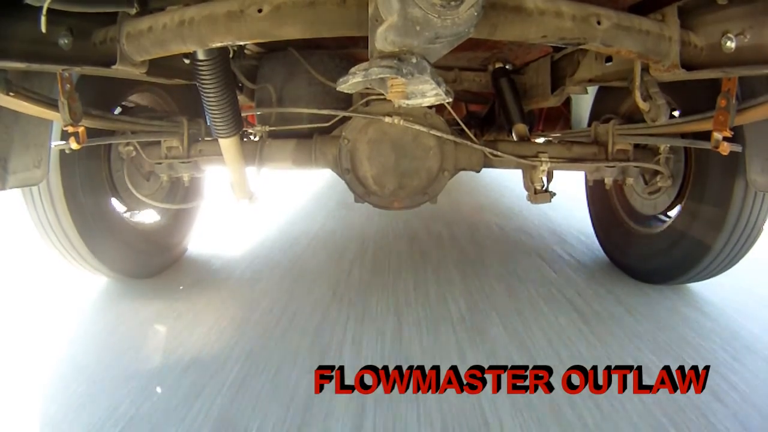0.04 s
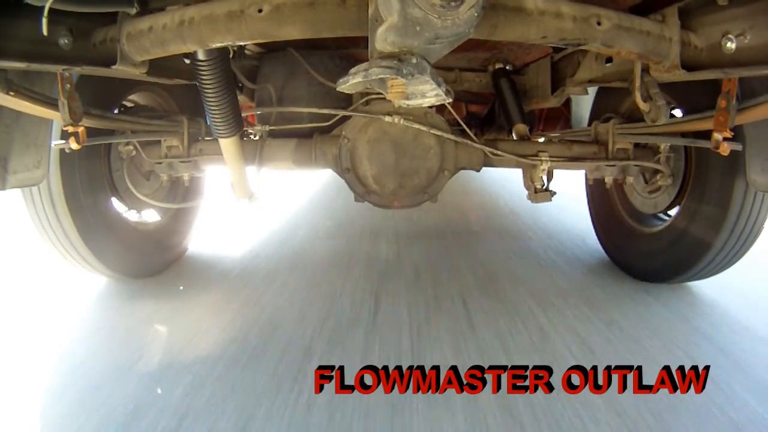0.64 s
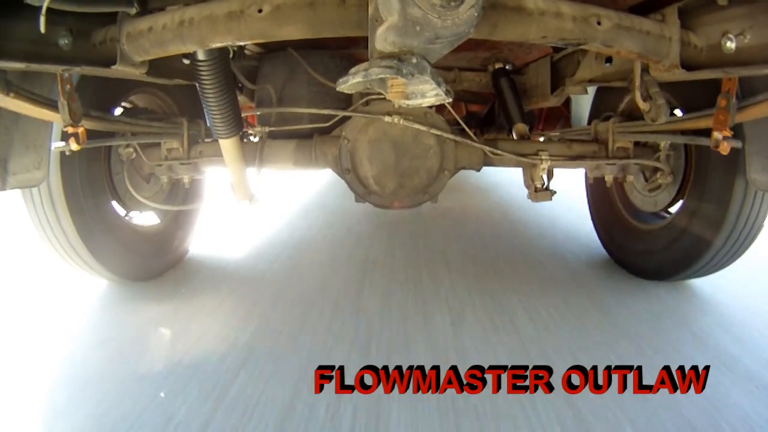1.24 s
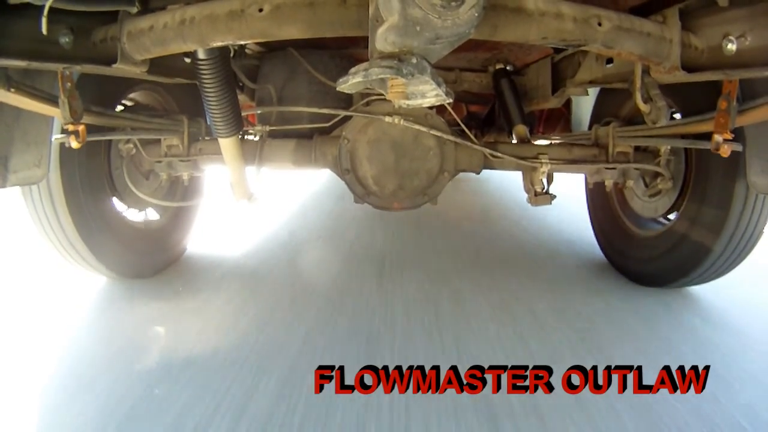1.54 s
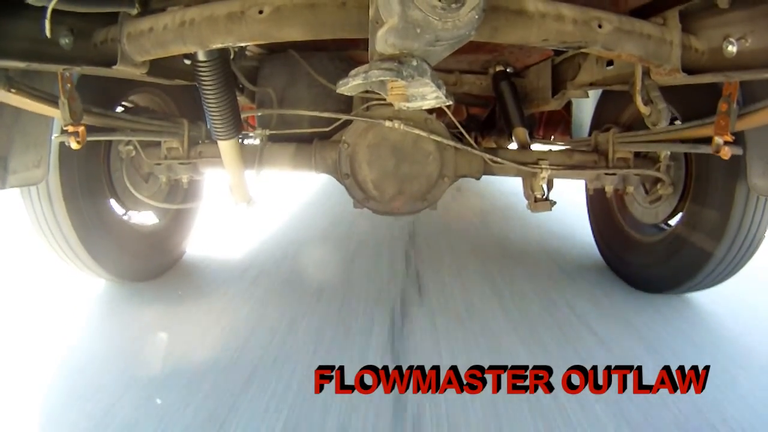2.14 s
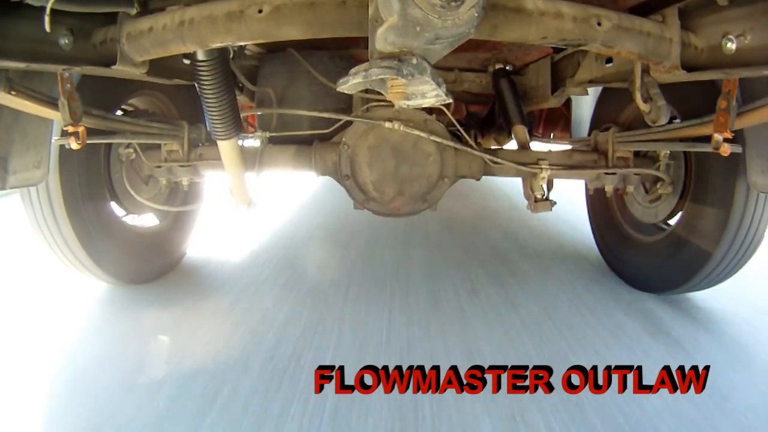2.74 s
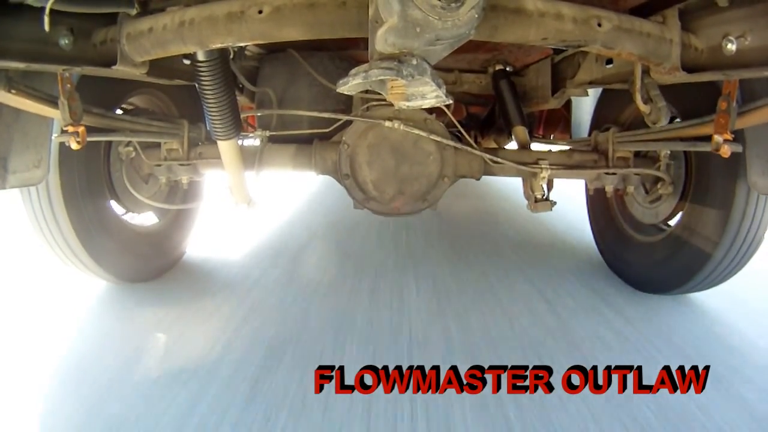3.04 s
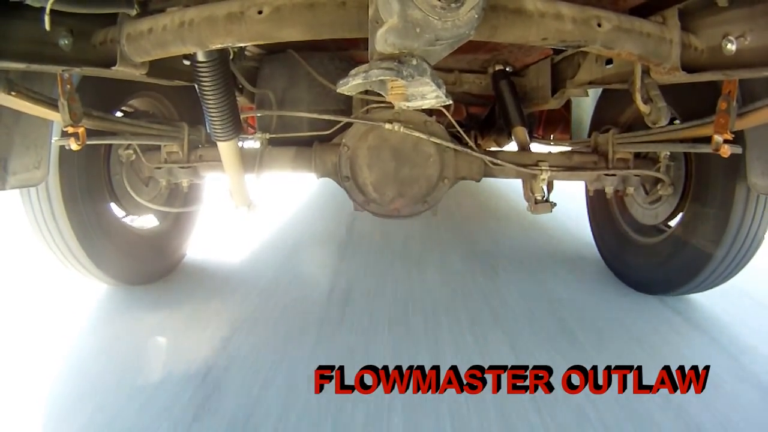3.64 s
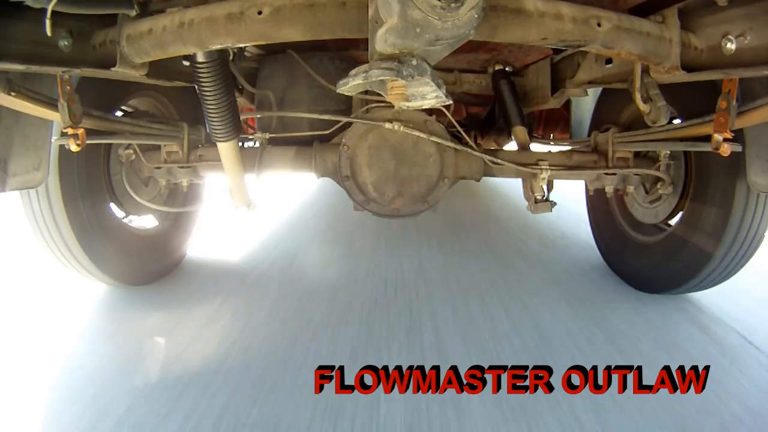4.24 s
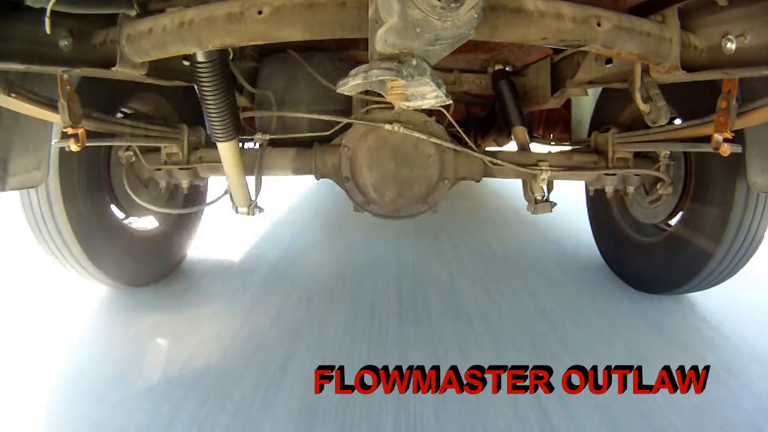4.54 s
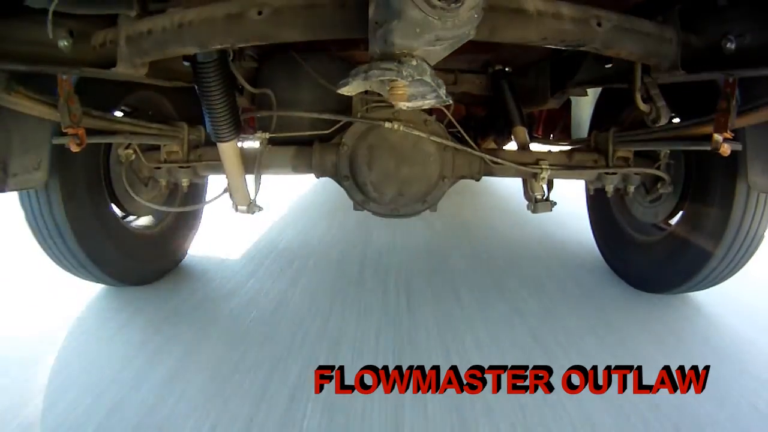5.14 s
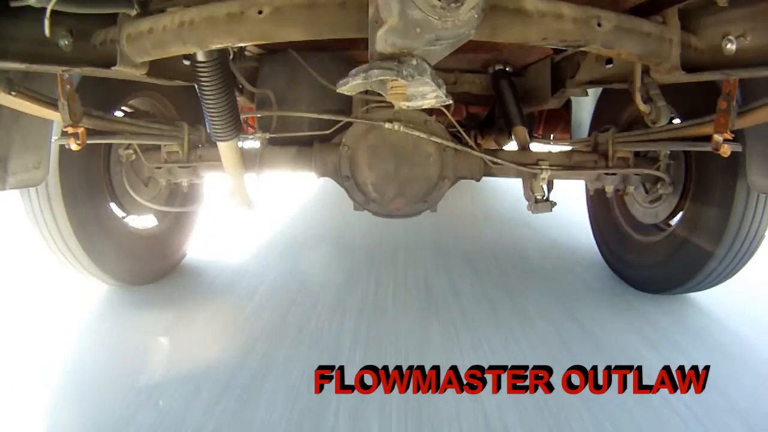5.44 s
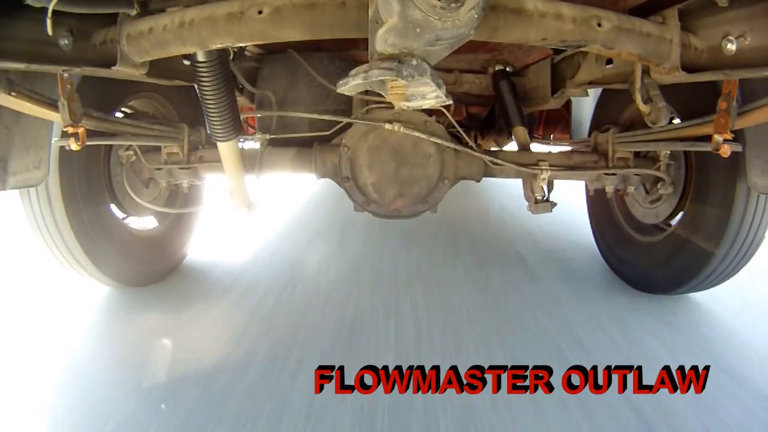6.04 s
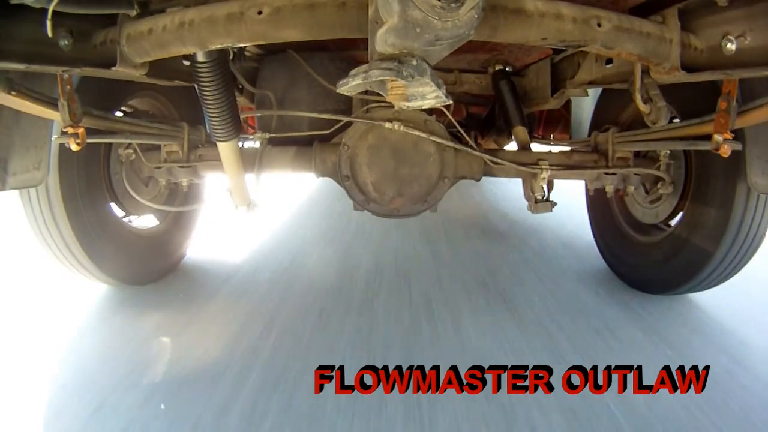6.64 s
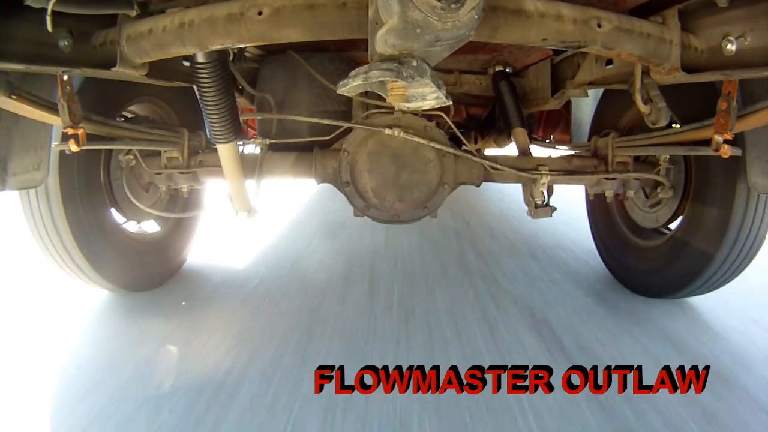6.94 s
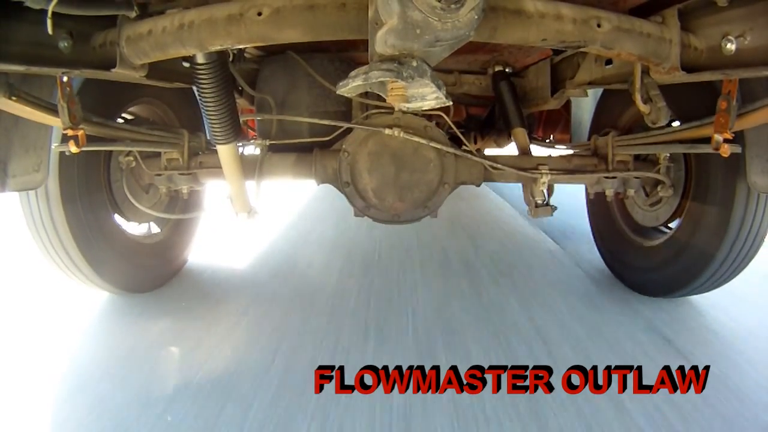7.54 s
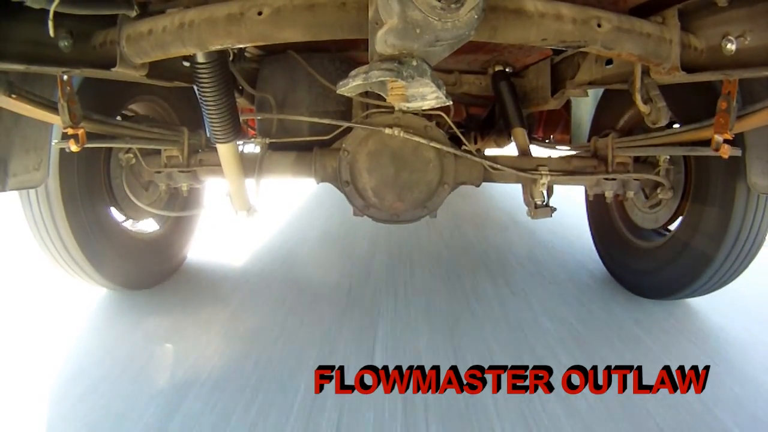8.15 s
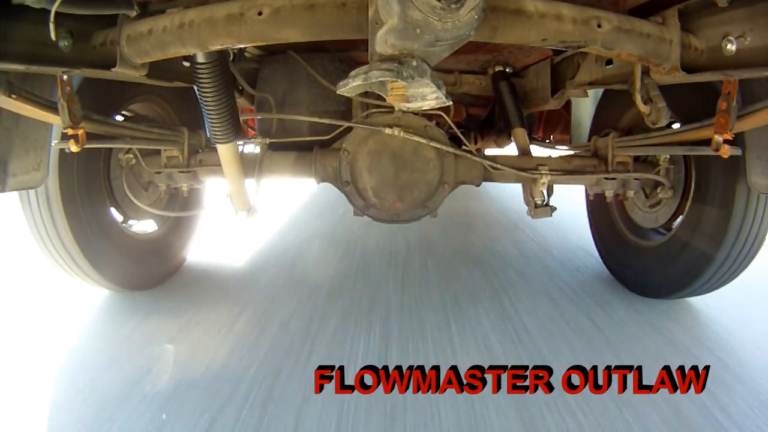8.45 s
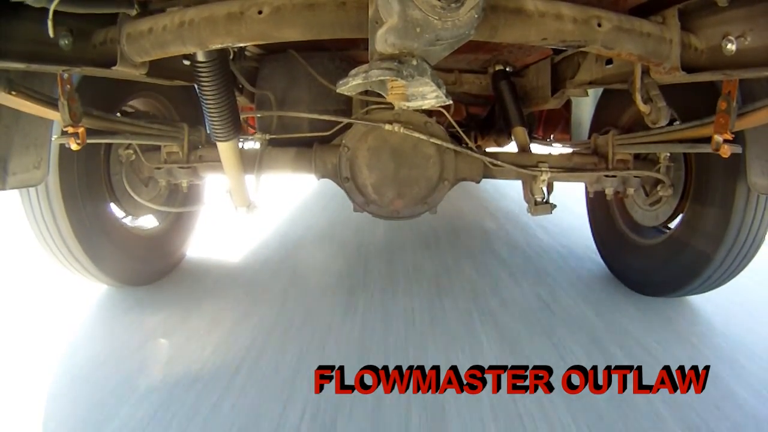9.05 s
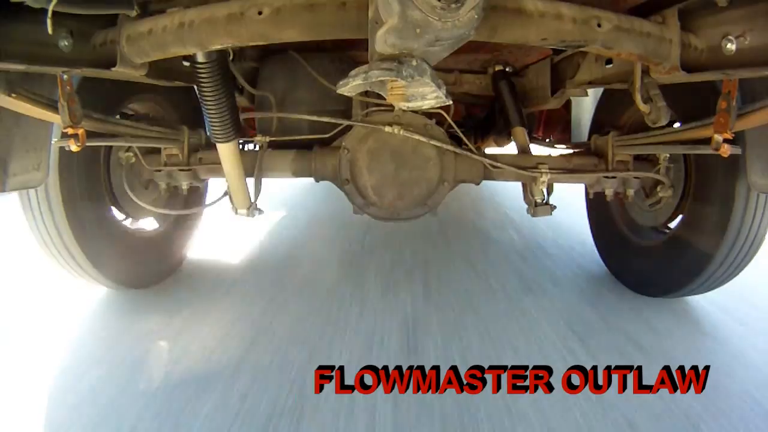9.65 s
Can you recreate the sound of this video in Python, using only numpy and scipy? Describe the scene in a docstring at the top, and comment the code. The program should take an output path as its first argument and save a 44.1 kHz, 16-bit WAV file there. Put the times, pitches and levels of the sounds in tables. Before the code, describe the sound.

Heard from under the bed of a moving pickup, the engine climbs in pitch with a metallic, buzzing rasp. It lets off, growls briefly as the revs fall, and continues as a quieter, pulsing exhaust throb. Gritty tyre noise and road rumble swell in the second half, while thin whines, occasional ticks and three low thumps sit underneath.

```python
"""A six-cylinder pickup pulls hard with a rasp, heard from under its bed beside the tailpipe.
It lifts off at 1.7 s, burbles down through the revs and rolls on at a throbbing near-idle.
Engine orders slide through the pipe's resonances, gas puffs out in pulses, and spits ring thin metal.
Tyres roar and fling grit over a low rumble, with faint whines, three low thumps and scattered ticks."""
import sys
import numpy as np
from scipy import signal
from scipy.fft import rfft, irfft, next_fast_len
from scipy.io import wavfile
from scipy.ndimage import map_coordinates

SR = 44100
rng = np.random.default_rng(int(sys.argv[2]) if len(sys.argv) > 2 else 0)


def dump(signal):
    """Clip the signal to [-1, 1] and save it as 16-bit WAV at the path in sys.argv[1]."""
    limited = np.clip(np.atleast_2d(signal).T, -1, 1)
    pcm = np.round(limited * 32767).astype(np.int16)
    wavfile.write(sys.argv[1], SR, pcm)


N = 431738
TIME = np.arange(N) / SR


def amp(db):
    """Decibels to gain."""
    return 10 ** (np.asarray(db) / 20)


def unit_rms(x):
    """Scales to rms 1."""
    return x / np.sqrt(np.mean(abs(x) ** 2) + 1e-20)


def curve(rows, t=TIME):
    """Piecewise-linear function of time."""
    return np.interp(t, *np.transpose(rows))


def coloured(x, spectrum, peaks=()):
    """Filters x by a spectrum and resonant peaks; rms 1."""
    size = next_fast_len(N)
    hz = np.fft.rfftfreq(size, 1 / SR)
    knot_hz, knot_db = np.transpose(spectrum)
    shape_db = np.interp(np.log(hz + 1), np.log(knot_hz), knot_db)
    for centre_hz, width_hz, peak_db in peaks:
        shape_db += peak_db / (1 + (2 * (hz - centre_hz) / width_hz) ** 2)
    return unit_rms(irfft(rfft(x, size) * amp(shape_db), size)[:N])


def wander(rate_hz, t=TIME):
    """Random drift, rate_hz new values a second; rms 1."""
    return unit_rms(np.interp(t * rate_hz, np.arange(8192), rng.standard_normal(8192)))


# Road noise contour: (time [s], relative level [dB])
ROAD_LEVEL = [(0, -41.5), (1.9, -49), (2.2, -40), (2.6, -42.5), (3.3, -39), (4.8, -38.5), (6.2, -31.5),
              (7.1, -32.5), (9.1, -32.5), (9.78, -37)]


def road_gain(top_db, follow=1):
    """Gain that swells with the road noise up to top_db; follow scales the swing."""
    level_db = curve(ROAD_LEVEL)
    return amp(top_db + follow * (level_db - level_db.max()))


# Low thumps: (time [s], level [dB])
LOW_THUMPS = [(2.42, -21), (7.265, -22), (9.2, -28)]
# Low rumble and thumps: (frequency [Hz], relative density [dB])
LOW_SPECTRUM = [(5, -10), (25, -2), (50, 0), (100, -6), (200, -22), (600, -50), (2000, -80)]


def low_rumble(steady_db=-38, thump_s=.018):
    """A low rumble that follows the road noise, plus three short low thumps."""
    thumps = sum(amp(db) * np.exp(-((TIME - at_s) / thump_s) ** 2) for at_s, db in LOW_THUMPS)
    return (road_gain(steady_db, follow=.32) + thumps) * coloured(rng.standard_normal(N), LOW_SPECTRUM)


# Whines: (frequency [Hz], level at loudest road noise [dB])
WHINE_TONES = [(893, -47), (1180, -49), (3078, -50), (4960, -55)]


def whines(waver_hz=7, shimmer_db=3):
    """Thin, wavering tones swell with the road noise."""
    tones = 0
    for hz, db in WHINE_TONES:
        gain = amp(db + shimmer_db * wander(25))
        phase = 2 * np.pi * np.cumsum(hz + waver_hz * wander(30)) / SR
        tones += gain * np.cos(phase)
    return road_gain(0) * np.sqrt(2) * tones


# Ticks and one soft bump: (time [s], jump [dB], edge [s])
TICKS = [(.5015, -2, .00002), (1.47, -2, .0002), (2.4215, -13, .00003), (3.3498, -17, .00003),
         (3.403, -4.5, .00002), (4.3635, -9, .00002), (5.285, -12.5, .00003), (5.323, -8, .00002),
         (9.2055, -6.5, .00002)]


def ticks(settle_s=.0017, half_samples=500):
    """Sudden jumps in the wave settle without ringing."""
    out, t = np.zeros(N), np.arange(-half_samples, half_samples) / SR
    for at_s, db, edge_s in TICKS:
        start = round(at_s * SR) - half_samples
        out[start:start + len(t)] -= amp(db) / 2 * np.tanh(t / edge_s) * np.exp(-abs(t) / settle_s)
    return out


# Tyre roar, rumble and hiss: (frequency [Hz], relative density [dB])
ROAR_SPECTRUM = [(100, -57), (400, -9), (640, 4.5), (810, -3), (900, 2), (1100, -1.5), (1190, 0),
                 (1450, -13), (2000, -13), (4000, -62)]
RUMBLE_SPECTRUM = [(30, -32), (75, -26), (170, 2.5), (240, -5), (330, -4), (420, -0.5), (520, -8.5),
                   (800, -16.5), (1500, -39), (4000, -66)]
HISS_SPECTRUM = [(600, -30), (1500, -13), (2000, -5), (3400, -8), (4300, -13.5), (5300, -15), (6000, -24)]
# Underbody resonances: (frequency [Hz], width [Hz], boost [dB])
UNDERBODY_CAVITIES = [(2280, 350, 4), (2505, 45, 4), (3075, 170, 8), (3670, 100, 3), (4950, 350, 7)]
# Bounces between road and underbody: (delay [s], gain [dB])
UNDERBODY_ECHOES = [(.0043, -13), (.0097, -12), (.0161, -12), (.0233, -13)]


def tyres(cycles, patchy_db=1.5, flicker_db=1.19, throb=.026, grit_per_s=700, grit_spread_db=3):
    """Tread roars and rumbles on asphalt and flings grit; the hiss throbs slightly with the engine."""
    roar = coloured(rng.standard_normal(N) * amp(patchy_db * wander(70)), ROAR_SPECTRUM)
    rumble = coloured(rng.standard_normal(N), RUMBLE_SPECTRUM)
    grains = amp(grit_spread_db * np.minimum(rng.exponential(1, N), 5)) * rng.choice([-1, 1], N)
    grit = unit_rms(grains * (rng.random(N) < grit_per_s / SR))
    swell = amp(flicker_db * wander(120)) * (1 + throb * bank_beat(cycles))
    hiss = coloured((rng.standard_normal(N) + .24 * grit) * swell, HISS_SPECTRUM, UNDERBODY_CAVITIES)
    echoes = sum(amp(db) * np.roll(hiss, round(delay_s * SR)) for delay_s, db in UNDERBODY_ECHOES)
    hiss = unit_rms(hiss + echoes)
    return road_gain(-32, follow=1.06) * roar + road_gain(-26, follow=.95) * rumble + road_gain(-32) * hiss


# Engine speed: (time [s], speed [rpm])
ENGINE_SPEED = [(0, 2880), (.6, 3327), (1.25, 3887), (1.65, 4070), (1.88, 3862), (2.52, 2337), (2.78, 2093),
                (3.12, 1395), (3.28, 1239), (3.7, 1232), (5, 1125), (5.7, 1050), (6.9, 984.6), (7.8, 949),
                (8.8, 860), (9.15, 848.6), (9.48, 950), (9.78, 992)]
PULL_RPM, IDLE_RPM = 3500, 1000
LIFT_S, SHUT_S, LULL_S, OVERRUN_S = 1.63, 2.18, 1.92, 2.064


def engine_gain(pull_db, shut_db, pull_db_per_oct, shut_db_per_oct, lull_db, t=TIME):
    """Level rises with revs; the throttle closes from LIFT_S to SHUT_S, with a lull until the overrun."""
    rpm = curve(ENGINE_SPEED, t)
    throttle = np.interp(t, [LIFT_S, SHUT_S], [1, 0])
    lull = np.interp(t, [LIFT_S, LULL_S, OVERRUN_S], [0, 1, 0])
    open_db = pull_db + pull_db_per_oct * np.log2(rpm / PULL_RPM)
    closed_db = shut_db + shut_db_per_oct * np.log2(rpm / IDLE_RPM)
    return amp(throttle * open_db + (1 - throttle) * closed_db + lull * lull_db)


def bank_beat(cycles):
    """One cylinder bank pulses three times per four-stroke cycle."""
    return np.cos(6 * np.pi * cycles)


# Outrushing gas: (frequency [Hz], relative density [dB])
PUFF_SPECTRUM = [(30, -35), (70, -8), (170, -8), (240, 0), (330, -9), (420, -1.5), (520, -15), (800, -22),
                 (1500, -38), (4000, -58)]


def puffs(cycles, depth=.17):
    """Turbulent gas leaves the pipe in time with one bank's pulses."""
    gas = rng.standard_normal(N) * (1 + depth * bank_beat(cycles))
    gain = engine_gain(pull_db=-31, shut_db=-37.5, pull_db_per_oct=21, shut_db_per_oct=5.5, lull_db=-10)
    return gain * coloured(gas, PUFF_SPECTRUM)


# Rasp under load: (frequency [Hz], relative density [dB])
RASP_SPECTRUM = [(500, -24), (850, 4), (1200, 0.5), (1620, -6.5), (1820, 0), (2400, 3), (3000, 4.5),
                 (3600, -2), (4200, -12.5), (5000, -7.5), (6000, -23.5)]
# Spits: (position [cycles], relative level [dB])
RASP_SPITS = [(.07, -5), (.27, -4), (.43, -6), (.6, -3), (.75, -5), (.93, -2)]
# Thin metal: (frequency [Hz], width [Hz], boost [dB])
METAL_RINGS = [(1850, 70, 8), (2243, 50, 5), (2377, 50, 4), (2708, 50, 5)]


def rasp(cycles, floor=.19, decay_cycles=.12, buzz_points=1100):
    """Spits of hiss ring thin metal; most of the noise repeats each cycle as a buzz."""
    position = cycles % 1
    gate = floor + sum(amp(db) * np.exp(-((position - at) % 1) / decay_cycles) for at, db in RASP_SPITS)
    pattern = rng.standard_normal(buzz_points)
    buzz = unit_rms(map_coordinates(pattern, [position * buzz_points], order=3, mode="grid-wrap"))
    gas = .8 * buzz + .6 * rng.standard_normal(N)
    gain = engine_gain(pull_db=-27.5, shut_db=-54, pull_db_per_oct=11, shut_db_per_oct=9.5, lull_db=-18.5)
    return gain * coloured(gate * gas, RASP_SPECTRUM, METAL_RINGS)


# Muffler and tailpipe resonances: (frequency [Hz], width [Hz], gain [dB])
PIPE_MODES = [(66, 22.4, 4.5), (118.73, 20.2, 9), (167.1, 23.6, 9), (191.7, 37.3, 4.5), (326.4, 34.7, -4),
              (425, 36, -12), (534, 35, -21), (661, 73, -35.5), (850, 84, -38), (1170, 71, -45)]


def pipe(hz):
    """Complex response of the exhaust; neighbouring standing waves alternate in sign."""
    return sum((-1) ** i * amp(db) / (1 + 1j * (hz ** 2 - mode_hz ** 2) / (hz * width_hz))
               for i, (mode_hz, width_hz, db) in enumerate(PIPE_MODES))


def growl(order, t, boost_db=9, centre_order=15.5, width_orders=1.7, hold_s=.32, fade_s=.17):
    """Gain of a cluster of orders that flares as the overrun catches and falls in pitch with the revs."""
    release_s = OVERRUN_S + hold_s
    flare = np.interp(t, [LULL_S, OVERRUN_S, release_s, release_s + fade_s], [0, 1, 1, 0])
    return amp(boost_db * flare * np.exp(-((order - centre_order) / width_orders) ** 2))


def order_phase(order, smear=.042):
    """Bank orders line up into a thump; low sidebands shift its timing, high ones spread into a chug."""
    if order % 3 == 0:
        return .35 * rng.standard_normal()
    if order < 24:
        return np.pi * (order % 3 == 2) + 1.2 * rng.standard_normal()
    return -np.pi * smear * order ** 2 + .5 * rng.standard_normal()


# Bank harmonics 1-8 ahead of the pipe: (level pulling at PULL_RPM [dB], level shut at IDLE_RPM [dB])
BANK_HARMONICS = [(-25, -30), (-17, -28.5), (-10.5, -30.5), (-18.5, -24.5), (-3.5, -28.8), (-14.5, -28.5),
                  (-1.5, -26.5), (1.5, -33)]


def order_gain(order, t, top_db_per_oct=-11, lope_db_per_oct=13):
    """Every third order is a bank harmonic; unequal cylinders fill in the rest as lope."""
    harmonic = min(order / 3, len(BANK_HARMONICS))
    rolloff_db = top_db_per_oct * np.log2(order / 3 / harmonic)
    if order == 6:  # only the firing tone outlasts the lull
        return engine_gain(*BANK_HARMONICS[1], pull_db_per_oct=18.5, shut_db_per_oct=3.5, lull_db=2, t=t)
    if order % 3 == 0:
        pull_db, shut_db = BANK_HARMONICS[int(harmonic) - 1]
        return engine_gain(pull_db + rolloff_db, shut_db,
                           pull_db_per_oct=6, shut_db_per_oct=5.5, lull_db=-7, t=t)
    tilt_db = lope_db_per_oct * np.log2(harmonic / len(BANK_HARMONICS))
    lower_sideband_db = 4 * (order % 3 == 2)
    chug_db = 4.5 * np.exp(-((order - 34.2) / 3.2) ** 2)  # one cylinder chugs with the throttle shut
    return amp(tilt_db) * engine_gain(pull_db=-8.5 + rolloff_db, shut_db=-34 + lower_sideband_db + chug_db,
                                      pull_db_per_oct=25, shut_db_per_oct=10, lull_db=-5, t=t)


def exhaust(cycles, orders=50, flutter_pull=.02, flutter_shut=.055, lug_db_per_oct=11.5, decimation=12):
    """Orders (harmonics of the four-stroke cycle) slide through the pipe's resonances."""
    t, cycles = TIME[::decimation], cycles[::decimation]
    rpm = curve(ENGINE_SPEED, t)
    flutter = np.interp(t, [LIFT_S, SHUT_S], [flutter_pull, flutter_shut])
    grid_hz = np.arange(2000)
    response = pipe(grid_hz + 1e-3)
    out = 0
    for order in range(1, orders + 1):
        hz = order * rpm / 120
        # no two burns are alike, which blurs the high orders most
        blur = flutter * (hz / 300 + .4) * (wander(22, t) + 1j * wander(22, t))
        tone = (1 + blur) * np.exp(1j * (2 * np.pi * order * cycles + order_phase(order)))
        out += (order_gain(order, t) * growl(order, t) * np.interp(hz, grid_hz, response) * tone).real
    lug = amp(lug_db_per_oct * np.maximum(np.log2(IDLE_RPM / rpm), 0))  # lugs louder below idle
    return signal.resample_poly(lug * out, decimation, 1, window=("kaiser", 9))[:N]


def scene():
    """Everything reaches one microphone; both channels are alike."""
    cycles = np.cumsum(curve(ENGINE_SPEED) / 120) / SR  # two crank turns per cycle
    mono = exhaust(cycles) + puffs(cycles) + rasp(cycles) + tyres(cycles) + whines() + low_rumble()
    return np.array([mono, mono])


def record(dry, self_noise_db=-56, droop=.2, cutoff_hz=15350):
    """The camera's 12 kHz sample-and-hold mirrors the sound into a fizzy treble; ticks and hiss join it."""
    coarse = signal.resample_poly(dry, 40, 147, axis=1)
    held = signal.resample_poly(np.repeat(coarse, 4, axis=1), 147, 160, axis=1)
    softened = signal.lfilter([1 - droop, droop], 1, held)
    heard = softened[:, :N] + ticks() + amp(self_noise_db) * rng.standard_normal(N)
    lowpass = signal.firwin(1023, cutoff_hz, window=("kaiser", 9), fs=SR)
    return signal.oaconvolve(heard, lowpass[None], "same")


dry = scene()
out = record(dry)
dump(out)
```